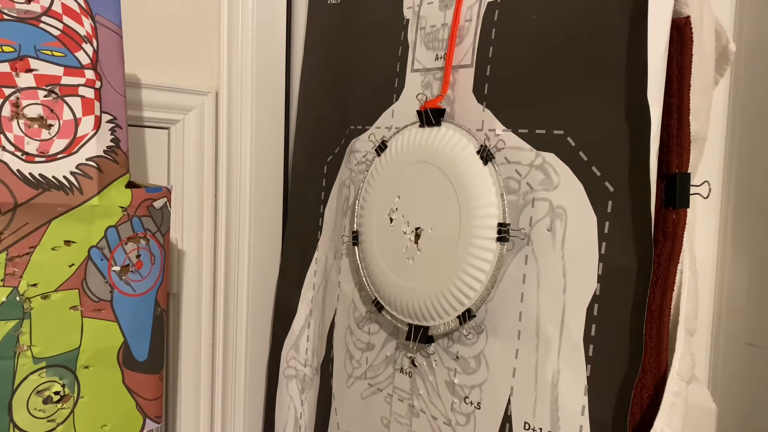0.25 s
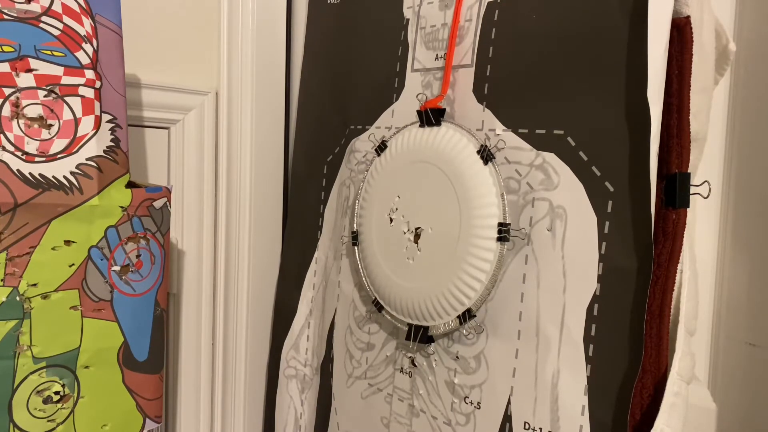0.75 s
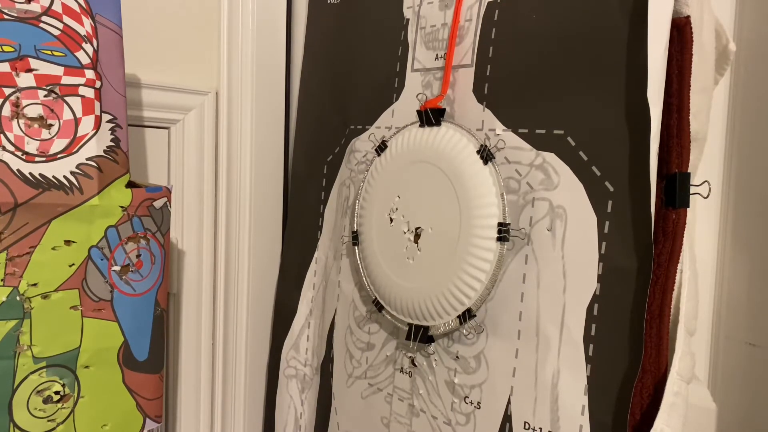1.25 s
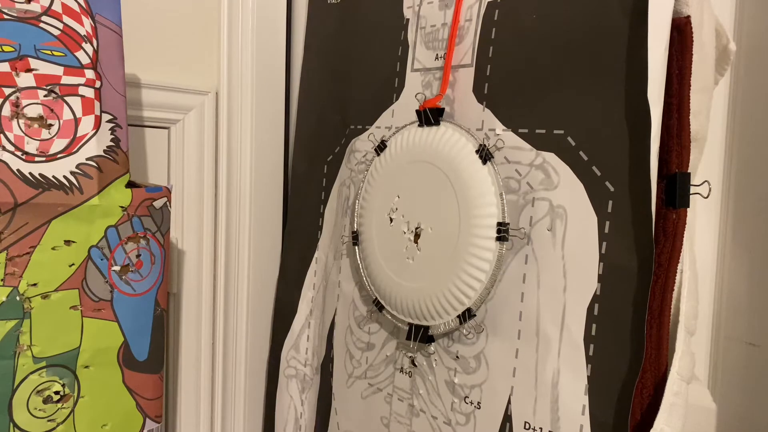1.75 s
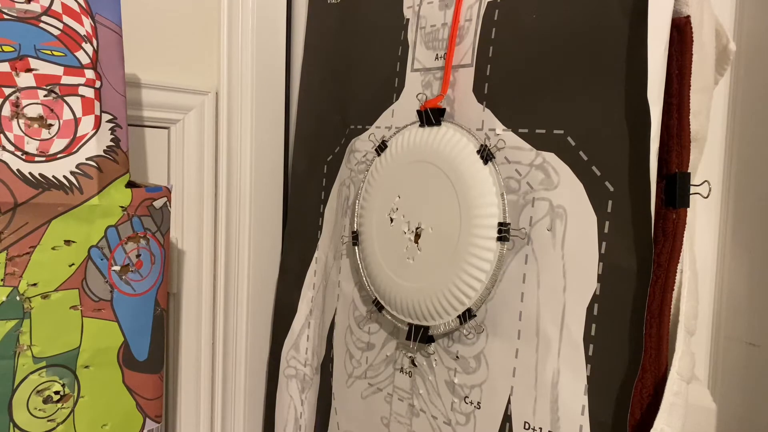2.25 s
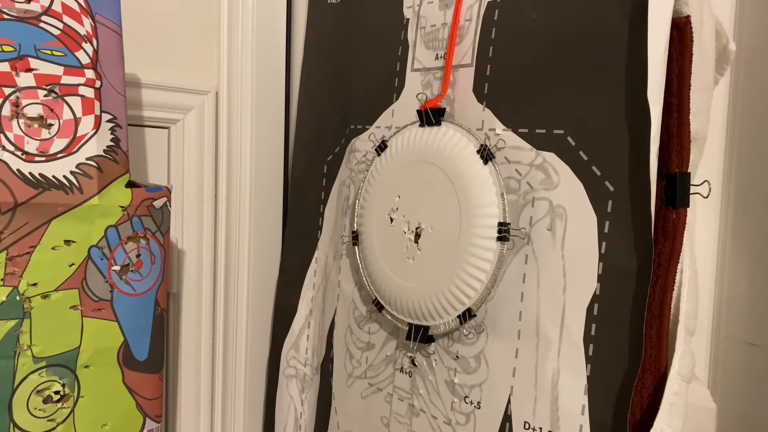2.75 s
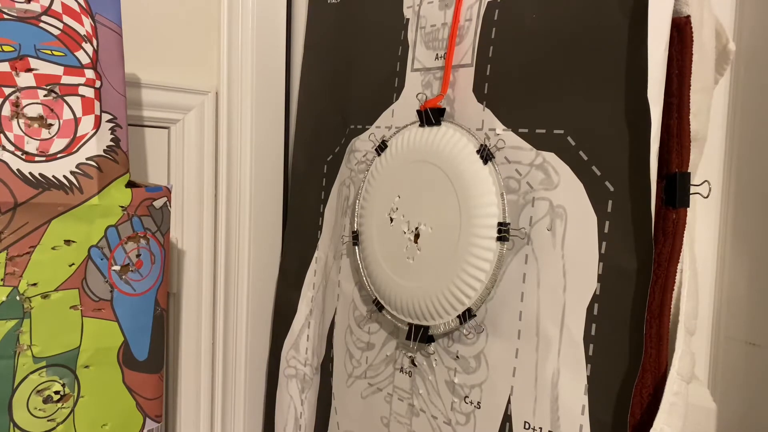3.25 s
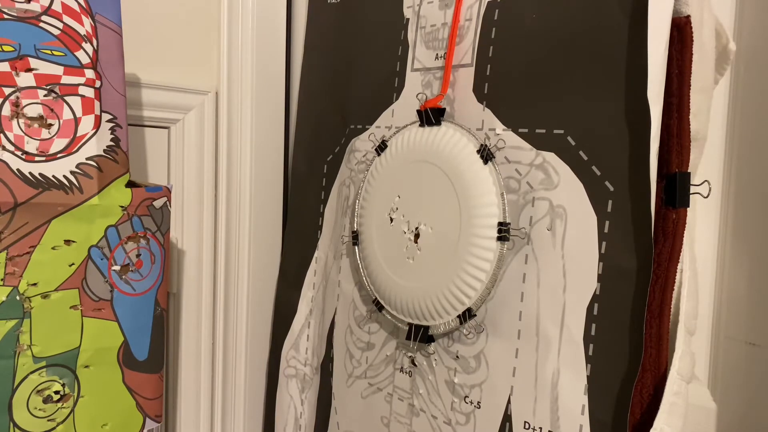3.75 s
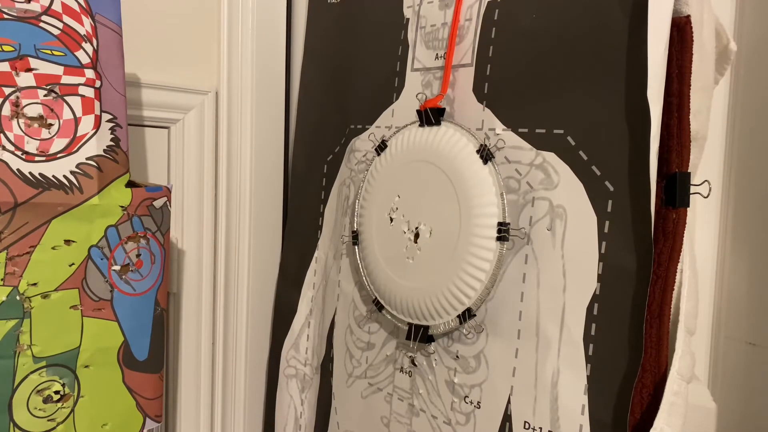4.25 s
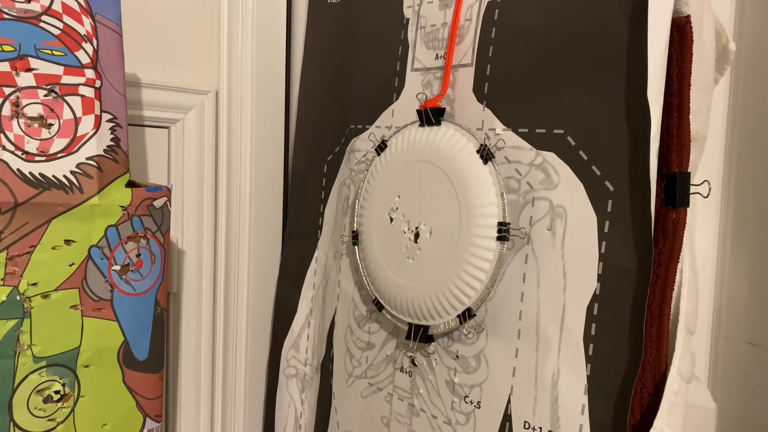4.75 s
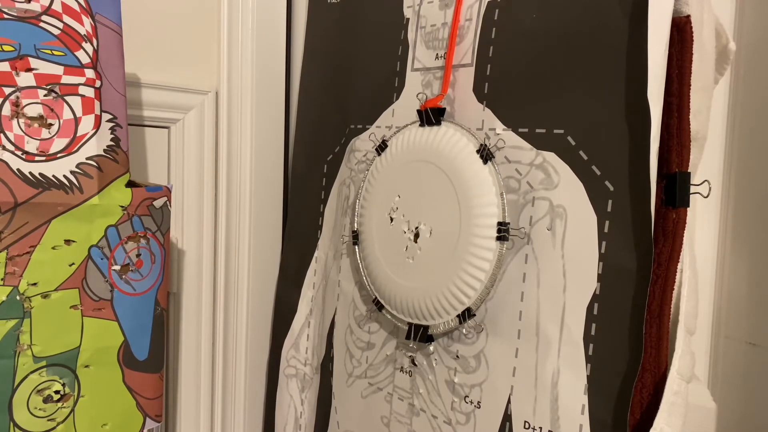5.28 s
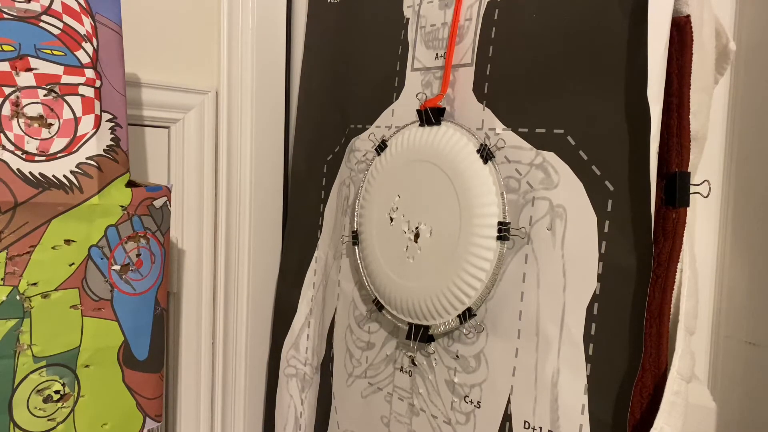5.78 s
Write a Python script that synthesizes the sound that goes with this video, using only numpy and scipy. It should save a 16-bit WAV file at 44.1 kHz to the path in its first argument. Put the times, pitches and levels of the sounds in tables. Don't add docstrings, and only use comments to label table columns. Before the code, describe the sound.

In a quiet indoor hallway with a faint low rumble and hum, a gas pistol fires five times about 1.2 seconds apart. Each shot is a sharp pop with a brief hiss, followed almost at once by a pellet tearing a paper plate and thumping its backing. Bare walls ring for about half a second. The first and last pellets rattle in a hollow trap. A phone close to the shooter ducks slightly after each blast.

```python
import sys
import numpy as np
from scipy import signal
from scipy.fft import rfft, irfft, next_fast_len
from scipy.io import wavfile
from scipy.ndimage import uniform_filter1d, map_coordinates

SR = 44100
rng = np.random.default_rng(int(sys.argv[2]) if len(sys.argv) > 2 else 0)


def master_out(mix):
    frames = np.transpose(np.atleast_2d(mix))
    ceiling = np.clip(frames, -1, 1)
    pcm = np.round(ceiling * 32767).astype(np.int16)
    wavfile.write(sys.argv[1], SR, pcm)


def gain_from_db(level_db):
    decades = np.asarray(level_db, float) / 20
    return 10 ** decades


N = 265482

# f/Hz, density/dB per Hz
RUMBLE = [(20, -29), (40, -3), (60, -3.5), (124, -9), (200, -13.5), (400, -11), (700, -21), (1150, -25.5),
          (1640, -35), (2400, -40.5), (3300, -36), (4200, -46.5), (8000, -52), (16500, -57)]
# f/Hz, likeness
RUMBLE_ALIKE = [(60, 1), (180, 0.52), (550, -0.37), (1650, -0.67), (4970, -1.8), (15000, -0.41)]
# f/Hz, level/dB rms
HUM = [(60, -74), (181, -71), (271.5, -79.5), (395, -83.5), (436, -88), (661, -90.5), (889, -95),
       (1114, -97), (2309, -101), (2369, -102), (3365, -94.5)]
# t/s, level/dB
TRIGGER = [
    (.17, -91),
    (1.402, -86),
    (2.65, -90),
    (3.89, -92),
    (5.035, -87),
]
# f/Hz, level/dB, t60/s
SPRING = [(3250, -8, .2), (3898, 0, .4), (4010, -4, .25), (4150, -8, .15), (6697, 0, .45), (6790, -6, .25)]
FIRED = [
    .3732,
    1.6421,
    2.9513,
    4.0246,
    5.2176,
]
# delay/ms, left level/dB, right level/dB
WALLS = [(0, 3.2, -7.5), (1.3, -3, -6.5), (3.1, 2.6, -5), (4.1, -4, -8), (5.3, -9.5, -6), (6.7, -7, -1),
         (9, -6.5, -8.5), (11.9, -7, -11)]
# f/Hz, level/dB
JET = [(300, -9), (1000, 5), (2500, -5.5), (5000, -10.5), (8000, -6.5), (12000, -7.5), (16000, -16.5),
       (17000, -120)]
# f/Hz, level/dB
WHISTLE = [(12500, -40), (14000, -3), (15300, 0), (15900, -2), (16300, -40)]
# f/Hz, level/dB
SWELL = [(1300, -29), (2100, 0), (3300, 0), (4000, -14), (4900, -2), (6800, 0), (7400, -6.5), (7700, -44.5)]
# f/Hz, width/Hz, level/dB
BARREL = [(1210, 120, 1.5), (1270, 310, -3), (1800, 67, -2), (2920, 99, -3.5), (3470, 1500, -10),
          (5530, 600, -7), (6400, 370, -3.5), (10100, 450, 1.5)]
# f/Hz, level/dB, t60/s
BOOM = [(65.4, -23.5, 0.16), (92.6, -22.5, 0.12), (147, -19, 0.17), (244, -14, .07), (308, -16.5, 0.05),
        (412, -8.5, 0.065), (1138, -8, 0.082), (2120, -17.5, .04)]
# tear level/dB, thump level/dB, thump f/Hz, slap level/dB, plate-to-backing delay/ms
IMPACTS = [
    (-15.5, 0.5, 1600, -3.5, 1.3),
    (-7.5, -1.5, 900, 2, 1.6),
    (-6.5, -1.4, 866, 4.5, 1.8),
    (-5, -0.95, 740, -4.5, .9),
    (-7.5, -9, 1100, 5, 0.57),
]
# f/Hz, level/dB
PAPER = [(2000, -23.5), (4500, -3), (7000, 2), (11000, -3.5), (16000, -11.5)]
# f/Hz, width/Hz, level/dB
BACKING = [(430, 300, -15), (1900, 190, -5), (2850, 350, -4.5), (3600, 500, -8.5)]
# f/Hz, level/dB
SLAP = [(900, -29), (1700, -2.5), (2200, -4.5), (2750, 0), (3600, -4), (4500, -7), (7000, -25.5)]
# f/Hz, t60/s
HALL_T60 = [(100, 0.43), (250, .45), (600, 0.65), (1500, 0.57), (3000, 0.64), (6000, 0.59), (11000, 0.47),
            (15000, 0.45)]
# f/Hz, level/dB
HALL_TONE = [(50, -20), (150, -18), (400, -3), (700, -3.5), (1200, 0), (1800, 1), (2300, -2), (3000, 1),
             (4000, -4.5), (5000, -2.5), (5800, -8), (6700, -3.5), (11000, -8.5), (15000, -9)]
# f/Hz, likeness
HALL_ALIKE = [(60, 0.87), (150, 0.044), (300, 0.69), (1000, 0), (5000, 0.063), (9000, .85), (15000, 0.75)]
# multiple of the pitch, width as share of f, level/dB
TRAP = [(1.001, 0.14, -0.5), (1.7, 0.12, -9)]
# f/Hz, level/dB
TICK = [(400, -6), (900, 8), (2500, 8), (6000, -3.5), (11000, -7.5), (16000, -4)]
# t/s, peak level/dB
RIM_HOPS = [
    (.549, -26.5),
    (.589, -38),
    (.602, -35),
    (.835, -57),
    (5.513, -38),
    (5.554, -42),
]
# t/s, peak level/dB
PAN_HOPS = [(.625, -38), (.671, -35.5), (.689, -49), (.71, -39.5), (.733, -41), (.747, -45), (.756, -41),
            (.77, -41.5), (.791, -45), (.802, -45.5), (.819, -61), (.859, -49), (.871, -70), (5.6, -45),
            (5.613, -58), (5.64, -45.5), (5.662, -47.5), (5.686, -46), (5.699, -55), (5.718, -57.5),
            (5.732, -57), (5.752, -55)]
# t/s, peak level/dB, knock level/dB
DROPS = [
    (2.2052, -59.5, 4),
    (2.2186, -73, 19),
    (2.3592, -68.5, -1),
    (2.4344, -72, -0.5),
    (2.4774, -72, -4.5),
    (5.7914, -62.5, 4.5),
    (5.8354, -57, 4),
    (5.8732, -61, 5),
]
# f/Hz, width/Hz, level/dB
LOST = [(9150, 900, -40), (13150, 1300, -40), (17900, 4000, -60)]
# f/Hz, width/Hz, level/dB
NEVER = (9150, 600, -22)

RUMBLE_DB = -65
WAVER_DB, WAVER_DB_PER_OCTAVE = 1.4, -0.18
RIM_HZ, RIM_CLICK_DB = 1267, 3
PAN_HZ, PAN_CLICK_DB = 753, -2
HOP_SCATTER = .045
LEAD_S = .03
RIGHT_LATER_MS = .3
FLIGHT_S = .0255
DIP_HZ, DIP_WIDTH_HZ, DIP_LEFT = 810, 750, 0.05
DUCK_DB, DUCK_FALL_S, DUCK_HOLD_S, DUCK_RISE_S = -3, .12, 0.023, 0.075
OVERSHOOT_DB, REST_DB, SETTLE_S = 3.5, 2.5, 0.11
WHOLE_S = .01
TOP_HZ, TOP_GATE_DB, TOP_RAGGED_DB = 13700, -87, 14
EDGE_LOW_HZ, EDGE_HIGH_HZ, EDGE_KEPT = 8400, 8800, .4


def unit(x):
    return x / np.sqrt(np.mean(x ** 2) + 1e-20)


def along(points, hz):
    f, v = np.transpose(points)
    return np.interp(np.log(hz + 1), np.log(f + 1), v)


def filtered(x, response):
    m = next_fast_len(x.shape[-1] + 2048, real=True)
    spectrum = rfft(x, m) * response(np.fft.rfftfreq(m, 1 / SR))
    return irfft(spectrum, m)[..., :x.shape[-1]]


def low_cut(x, hz):
    return filtered(x, lambda f: (1j * f / (hz + 1j * f)) ** 2)


def body(modes):
    def response(f):
        total = 0
        for k, (c, w, db) in enumerate(modes):
            total = total + (-1) ** k * gain_from_db(db) * 1j * f * w / (c * c - f * f + 1j * f * w)
        return total
    return response


def paired(two, alike, lag_ms):
    def mid_side(hz):
        turn = np.arccos(np.clip(along(alike, hz), -1, 1)) / 2
        return np.array([np.cos(turn), np.sin(turn)])
    mid, side = filtered(two, mid_side)
    pair = np.array([mid + side, mid - side])
    return filtered(pair, lambda hz: np.exp(-2j * np.pi * hz * [[lag_ms / 1000], [0]]))


def burst(t, t60, spectrum):
    noise = paired(rng.standard_normal((2, t.shape[-1])), HALL_ALIKE, lag_ms=.18)
    noise = unit(filtered(noise, lambda hz: gain_from_db(along(spectrum, hz))))
    return noise * (t > 0) * gain_from_db(-60 * np.abs(t) / t60)


def ring(t, modes):
    onset = 1 - np.exp(-t / .004)
    return sum(gain_from_db(db - 60 * t / t60) * np.sin(2 * np.pi * hz * t) * onset for hz, db, t60 in modes)


def add(out, x, s):
    k = round(s * SR)
    out[..., k:k + x.shape[-1]] += x[..., :N - k]


def house():
    noise = filtered(rng.standard_normal((2, N)), lambda hz: gain_from_db(along(RUMBLE, hz)))
    out = gain_from_db(RUMBLE_DB - 3.0) * unit(paired(noise, RUMBLE_ALIKE, lag_ms=0.07))
    t = np.arange(N) / SR
    for hz, db in HUM:
        waver_db = WAVER_DB + WAVER_DB_PER_OCTAVE * abs(np.log2(hz / 200))
        waver = map_coordinates(rng.standard_normal(80), [12 * t])
        drift = .3 * waver_db * map_coordinates(rng.standard_normal(80), [9 * t])
        phase = rng.uniform(0, 2 * np.pi) + drift
        out = out + np.sqrt(2) * gain_from_db(db + waver_db * waver) * np.sin(2 * np.pi * hz * t + phase)
    return out


def trigger():
    out, t = np.zeros(N), np.arange(SR // 4) / SR
    for s, db in TRIGGER:
        add(out, gain_from_db(db) * ring(t, SPRING), s)
    return out


def knock(t, hz):
    contact = np.exp(-((t - .001) / 0.000088) ** 2)
    one = filtered(contact, body([(hz * k, hz * k * w, db) for k, w, db in TRAP]))
    answer = gain_from_db(-9) * np.roll(one, round(.013 * SR))
    return (one + answer) / one.max()


def pellets():
    out, t = np.zeros((2, N)), np.arange(SR // 10) / SR
    for hops, hz, click_db in [(RIM_HOPS, RIM_HZ, RIM_CLICK_DB), (PAN_HOPS, PAN_HZ, PAN_CLICK_DB)]:
        for s, db in hops:
            spot_hz = hz * (1 + HOP_SCATTER * rng.standard_normal())
            click = gain_from_db(click_db - 8.0) * burst(t, 0.084, TICK)
            add(out, gain_from_db(db - 2.5) * (knock(t, spot_hz) + click), s)
    for s, db, knock_db in DROPS:
        tick = gain_from_db(-5.0) * burst(t, 0.16, TICK)
        add(out, gain_from_db(db) * (gain_from_db(knock_db - 3) * knock(t, hz=750) + tick), s)
    return out


def bangs():
    out = np.zeros((1, N))
    for s, (_, thump_db, _, _, later_ms) in zip(FIRED, IMPACTS):
        out[0, round(s * SR)] = gain_from_db(15.5)
        out[0, round((s + FLIGHT_S + later_ms / 1000) * SR)] = gain_from_db(thump_db + 1.0)
    return out


def hallway(x):
    out = np.zeros((2, N))
    starts = [round((s - LEAD_S) * SR) for s in FIRED]
    for a, b in zip(starts, starts[1:] + [N]):
        hz, t, z = signal.stft(rng.standard_normal((2, SR)), SR, nperseg=256)
        decay_db = along(HALL_TONE, hz)[:, None] - 60 * t / along(HALL_T60, hz)[:, None]
        tail = signal.istft(z * gain_from_db(decay_db), SR, nperseg=256)[1]
        tail = paired(tail / np.linalg.norm(tail[0]), HALL_ALIKE, lag_ms=.18)
        add(out, signal.fftconvolve(x[:1, a:b], tail, axes=1), a / SR + .009)
    return out


def pop(t):
    u = np.clip(t / .00006 + 1, 0, None)
    return low_cut(u * (2.5 - u) * np.exp(1 - u), 800)


def near_walls(t):
    delay_ms, *wall_db = np.transpose(WALLS)
    when = t - (delay_ms[:, None, None] + np.array([[0], [RIGHT_LATER_MS]])) / 1000
    gain = gain_from_db(np.transpose(wall_db))[..., None]
    pops = np.sum(gain * pop(when), axis=0)
    puffs = np.sum(gain * (when > 0) * gain_from_db(-60 * np.abs(when) / 0.0097), axis=0)
    return pops, puffs


def hollowed(x):
    def notch(f):
        rest = DIP_HZ ** 2 - f * f
        return (rest + 1j * f * DIP_WIDTH_HZ * DIP_LEFT) / (rest + 1j * f * DIP_WIDTH_HZ)
    return filtered(x, notch)


def muzzle(t, pops, puffs):
    swell = burst(-t, 0.034, SWELL) * np.clip((t + 0.021) / 0.0027, 0, 1)
    shot = gain_from_db([[-40], [-22]]) * swell
    shot += gain_from_db(-17) * burst(t + .0012, .012, JET)
    shot += gain_from_db(-1) * pops
    shot += gain_from_db(-9.0) * filtered(pops, body(BARREL))
    shot += gain_from_db(-9.5) * puffs * burst(t, 0.97, JET)
    shot += gain_from_db(-14.5) * burst(t, 0.15, JET)
    shot += gain_from_db(-21) * burst(t, .09, WHISTLE)
    boom_t = np.clip(t - np.array([[.003], [.0034]]), 0, None)
    return hollowed(shot) + gain_from_db([[0], [-5.5]]) * ring(boom_t, BOOM)


def target(t, tear_db, thump_db, thump_hz, slap_db, later_ms):
    at_plate = t - FLIGHT_S
    at_backing = at_plate - later_ms / 1000
    tear = gain_from_db(tear_db - 2.0) * burst(at_plate, 0.012, PAPER)
    blow = np.exp(-((at_backing - np.array([[0], [.0002]])) / .00007) ** 2)
    blow = blow + 0.1 * burst(at_plate, .01, JET)
    panel = [(hz, w, db + slap_db) for hz, w, db in BACKING] + [(thump_hz, 0.3 * thump_hz, 0)]
    thump = gain_from_db(thump_db + 16.5) * gain_from_db([[0], [-4]]) * filtered(blow, body(sorted(panel)))
    flutter = gain_from_db(slap_db - 13.5) * burst(at_backing, 0.033, SLAP)
    return tear - thump + flutter


def pistol():
    out, t = np.zeros((2, N)), np.arange(SR // 4) / SR - LEAD_S
    pops, puffs = near_walls(t)
    for s, impact in zip(FIRED, IMPACTS):
        shot = muzzle(t, pops, puffs) + target(t, *impact)
        add(out, low_cut(shot, 45), s - LEAD_S)
    return out


def scene():
    balls = pellets()
    echo = hallway(bangs() + gain_from_db(-12.5) * balls[:1])
    return pistol() + balls + echo + trigger() + house()


def without(x, bands):
    return filtered(x, lambda hz: gain_from_db(sum(db * np.exp(-((hz - c) / (w / 2)) ** 8) for c, w, db in bands)))


def gated(x):
    hz, _, z = signal.stft(x, SR, nperseg=2048)
    frames = z.shape[2]
    level = uniform_filter1d(np.abs(z).mean(0), size=20, axis=0)
    patches = rng.standard_normal((len(hz) // 20 + 1, frames // 2 + 1))
    patches = np.kron(patches, np.ones((20, 2)))[:len(hz), :frames]
    keep = (hz[:, None] < TOP_HZ) | (level > gain_from_db(TOP_GATE_DB + TOP_RAGGED_DB * patches))
    edge = (hz > EDGE_LOW_HZ) & (hz < EDGE_HIGH_HZ)
    lucky = np.repeat(rng.random(frames) < EDGE_KEPT, 2)[:frames]
    keep[edge] = lucky | (level[edge].mean(0) > gain_from_db(-58))
    return signal.istft(z * keep, SR, nperseg=2048)[1][:, :N]


def band_limit(x):
    return signal.sosfilt(signal.butter(12, 16960, fs=SR, output="sos"), x)


def record(dry):
    t = np.arange(N) / SR
    since = np.min([np.where(t >= s, t - s, 9) for s in FIRED], axis=0)
    x = low_cut(dry, 40)
    duck_s = np.cumsum([0, DUCK_FALL_S, DUCK_HOLD_S, DUCK_RISE_S, SETTLE_S])
    x = x * gain_from_db(np.interp(since, duck_s, [0, DUCK_DB, DUCK_DB, OVERSHOOT_DB, REST_DB]))
    x = x / (1 + np.abs(x / .9) ** 6) ** (1 / 6)
    x = filtered(x, lambda hz: 1 / (1 + (hz / 16200) ** 60))
    whole = uniform_filter1d(1. * (since < WHOLE_S), size=300)
    x = whole * without(x, [NEVER]) + (1 - whole) * without(x, LOST)
    return band_limit(gated(x))


dry = scene()
out = record(dry)
master_out(out)
```